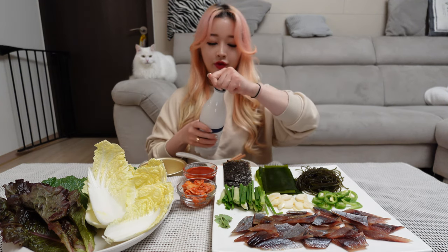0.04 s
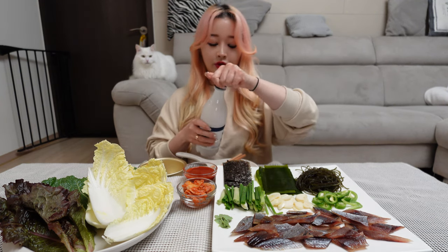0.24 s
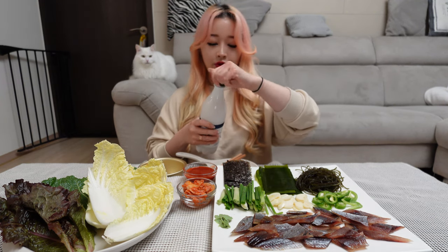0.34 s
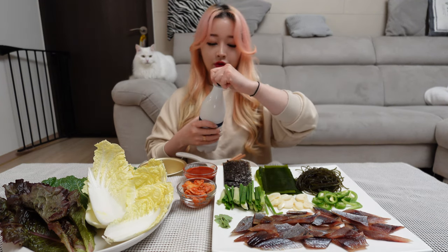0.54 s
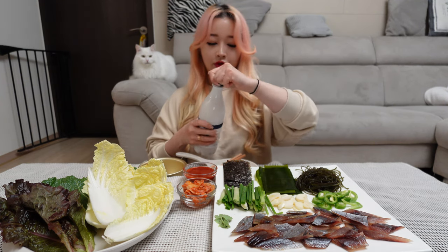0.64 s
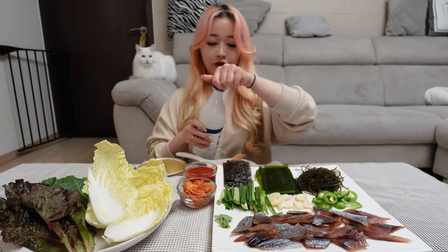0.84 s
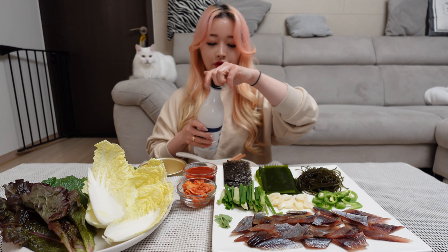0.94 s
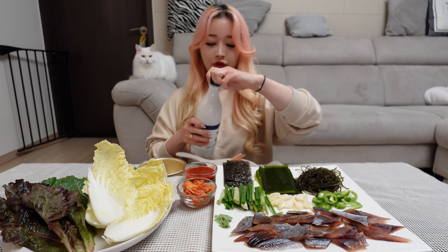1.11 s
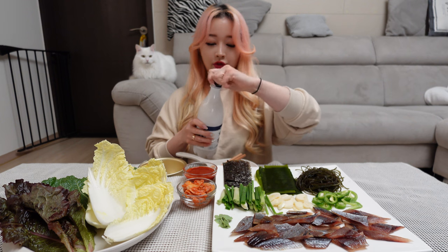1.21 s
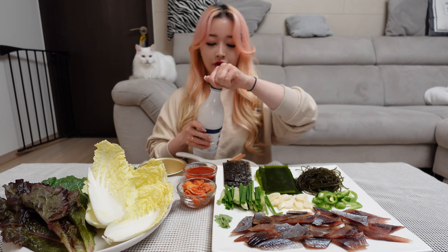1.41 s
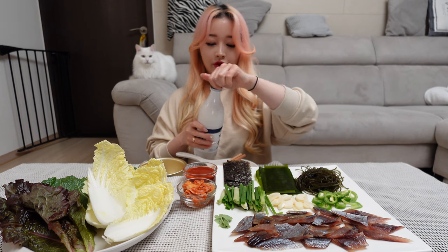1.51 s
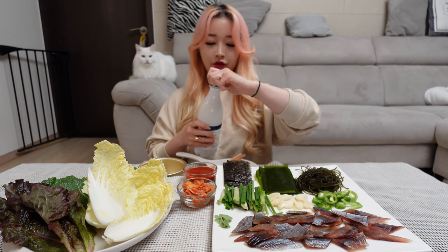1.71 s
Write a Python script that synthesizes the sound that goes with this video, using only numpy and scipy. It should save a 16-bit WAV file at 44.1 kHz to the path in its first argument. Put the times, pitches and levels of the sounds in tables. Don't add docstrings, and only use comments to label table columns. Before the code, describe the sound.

A fizzy bottle's plastic cap twists open in crisp cracks and brief hissing spurts over soft fizz

```python
import sys
import numpy as np
from scipy import signal
from scipy.fft import rfft, irfft
from scipy.io import wavfile

SR = 44100
rng = np.random.default_rng(int(sys.argv[2]) if len(sys.argv) > 2 else 0)


def wav_record(signal):
    frames = np.transpose(np.atleast_2d(signal))
    bounded = np.clip(frames, -1, 1)
    quanta = np.round(bounded * 32767).astype(np.int16)
    wavfile.write(sys.argv[1], SR, quanta)


def convert_level_to_amplitude(level_db):
    exponent = np.asarray(level_db, float) / 20
    return 10 ** exponent


N = 77175

NOISE_EDGE_HZ = 15800
# hz, likeness (0 to 1)
ROOM_LIKENESS = [(2000, 0.99), (4000, 0.56), (8000, 0.63), (15000, 0.72)]
# hz, likeness (0 to 1)
STEADY_LIKENESS = [(60, 0.89), (180, 0.89), (550, 0.71), (1650, 0.61), (4970, 0.52), (15000, 0.8)]


def rms_one(x):
    return x / np.sqrt(np.mean(x ** 2) + 1e-20)


def unit(x):
    energy = np.sum(x ** 2, axis=1)
    pair = energy[:2].mean()
    return x / np.sqrt([[pair], [pair], [energy[2]]])


def at_hz(points, hz):
    table_hz, value = np.transpose(points)
    return np.interp(np.log(hz), np.log(table_hz), value)


def drift(rate_hz):
    r = np.exp(-2 * np.pi * rate_hz / SR)
    wander = signal.lfilter([1], [1, -2 * r, r * r], rng.standard_normal(N + SR))
    return rms_one(wander[SR:])


def resonate(x, hz, width_hz):
    r = np.exp(-np.pi * width_hz / SR)
    feedback = [1, -2 * r * np.cos(2 * np.pi * hz / SR), r * r]
    return signal.lfilter([(1 - r * r) / 2, 0, (r * r - 1) / 2], feedback, x)


def high_pass(x, hz):
    return signal.sosfilt(signal.butter(4, hz, "high", fs=SR, output="sos"), x)


def to_stereo(mid, side, likeness):
    return np.sqrt(1 + likeness) * mid + np.sqrt(1 - likeness) * side * [[1], [-1]]


def stereo_noise(spectrum, alike):
    hz = np.maximum(np.arange(N // 2 + 1) * SR / N, 1)
    likeness = np.clip(at_hz(alike, hz), 0, 1)
    low_edge = np.minimum(1, hz / spectrum[0][0]) ** 4
    high_edge = np.minimum(1, min(spectrum[-1][0], NOISE_EDGE_HZ) / hz) ** 200
    white = rfft(rng.standard_normal((2, N)))
    mid, side = white * convert_level_to_amplitude(at_hz(spectrum, hz)) * low_edge * high_edge
    return rms_one(irfft(to_stereo(mid, side, likeness), N))


def snaps():
    # start_s, then neck_db, skirt_db, crack_db, top_crack_db (energy)
    snap_table = [(0.2238, -53, -30, -18, -10), (0.2258, -11, -9.5, -7, -6.0),
                  (0.3723, -20.5, -22, -35, -36), (0.6116, -8, -2, -11.5, -7),
                  (0.6136, -4.5, -14, -7.5, -10.5), (0.644, -4.0, -26, -7.5, -10),
                  (0.6567, -10.0, -15, -16, -13.0), (0.6854, -5.0, -22, -7, -4.5),
                  (0.703, -14, -37, -7, -13), (0.7188, -15, -22, -10, -12.0), (0.7562, -6, -13, -3.5, -12),
                  (0.771, -15.5, -21, -16, -15), (0.8214, -6.5, -9.5, -6.5, -2.5),
                  (0.842, -16.0, -38, -6.0, -12), (0.96, -25, -41.0, -30, -29),
                  (1.2384, -27, -41, -22, -22), (1.267, -25.5, -40, -14.5, -15.5),
                  (1.371, -4.5, -11.5, -3.5, -2.0), (1.4642, -13.5, -18, -10, -13),
                  (1.5778, -23.5, -37, -30, -32), (1.6683, -34, -29, -23.5, -45)]
    # neck_hz, crack_hz, room_send_db
    pitch_table = [(3000, 8600, 3), (2580, 7500, 0.5), (3000, 6400, 0), (2930, 7600, -2), (2926, 8800, -1),
                   (2770, 10700, 2), (2800, 13000, -2.5), (2670, 9100, -0.5), (3280, 8500, 0),
                   (2600, 12700, -7.5), (2500, 11300, -1.5), (2400, 7800, 0.5), (3015, 8500, -0.5),
                   (2480, 9100, -1.5), (2780, 13000, -1), (2250, 9100, 4), (2300, 9300, -11),
                   (2770, 10260, 0), (2810, 11200, -1.5), (2650, 8400, -3), (2600, 10400, -1)]
    creak_db, creak_s, tear_s = -29, 0.00035, 0.0011
    splinter_db, splinter_share = 3.0, 2.54
    likeness = 0.77
    lead = 300
    t = (np.arange(900) - lead) / SR
    creak = convert_level_to_amplitude(creak_db) * np.exp(np.minimum(t, 0) / creak_s)
    shape = np.where(t < 0, creak, np.exp(-np.maximum(t, 0) / tear_s))
    first_break = t == 0
    noise = rng.standard_normal((len(snap_table), 2, len(t)))
    rough = rng.exponential(1, (len(snap_table), len(t)))
    out = np.zeros((3, N + SR))
    for (start_s, *levels_db), (neck_hz, crack_hz, send_db), grain, jolt in zip(
            snap_table, pitch_table, noise, rough):
        mid, side = shape * grain * convert_level_to_amplitude(splinter_db * np.minimum(jolt, 3))
        size = np.sqrt(np.sum(mid ** 2)) / splinter_share
        mid = mid / size + first_break
        side = np.sqrt(1 - likeness) * high_pass(side / size, 4700)
        tear = np.array([mid + side, mid - side, first_break])
        sound = bottle_and_cap(tear, levels_db, neck_hz, crack_hz)
        sound = sound * convert_level_to_amplitude(send_db * np.array([[0], [0], [1]]))
        i = int(start_s * SR) - lead
        out[:, i:i + len(t)] += sound
    return high_pass(out[:, :N], 1100)


def bottle_and_cap(tear, levels_db, neck_hz, crack_hz):
    def ring(hz, width_hz):
        once = resonate(tear, hz, width_hz)
        return unit(resonate(once, hz, 2 * width_hz))
    neck_width_hz, shoulder_hz = 680, 4260
    neck = ring(neck_hz, neck_width_hz)
    neck = neck - convert_level_to_amplitude(-12) * ring(shoulder_hz, neck_width_hz)
    neck = neck - convert_level_to_amplitude(-27) * ring(1700, 1260)
    skirt = ring(5810, 2230)
    crackle = unit(high_pass(tear, shoulder_hz))
    crack = ring(crack_hz, 3800) + convert_level_to_amplitude(-7) * crackle
    top_crack = ring(14540, 3200)
    parts = [neck, skirt, -crack, top_crack]
    return sum(convert_level_to_amplitude(db) * part for db, part in zip(levels_db, parts))


def room(direct, diffuse):
    # delay_s, level_db, low_cut_hz
    echo_table = [
        (.0013, -15, 2000),
        (.0083, -13.5, 10000),
        (.0099, -7, 12300),
    ]
    # hz, time_s
    dying_time = [(2000, .42), (4000, 0.52), (8000, 0.44), (15000, 0.29)]
    # hz, level_db
    tail_colour = [(2000, 0.5), (3000, -3.5), (4200, 1), (6000, 1), (8500, -5.5), (11500, -4.5), (15000, 4)]
    onset_s, tail_db = 0.0058, -9
    t = np.arange(SR // 2) / SR
    white = rng.standard_normal((2, 2, len(t)))
    edges = 1400 * 2 ** np.arange(0, 3.8, 0.5)
    tail = 0
    for k, (low, high) in enumerate(zip(edges, edges[1:])):
        hz = np.sqrt(low * high)
        band = signal.butter(2, [low, high], "band", fs=SR, output="sos")
        mid, side = signal.sosfilt(band, white[k % 2])
        pair = to_stereo(mid, side, np.clip(at_hz(ROOM_LIKENESS, hz), 0, 1))
        tail = tail + pair * convert_level_to_amplitude(at_hz(tail_colour, hz) - 60 * t / at_hz(dying_time, hz))
    tail = tail * np.clip((t - onset_s) / 0.003, 0.15, 1) * convert_level_to_amplitude(tail_db) / 20
    edge_cut = signal.cheby2(12, 50, NOISE_EDGE_HZ + 500, fs=SR, output="sos")
    tail = signal.sosfilt(edge_cut, tail)
    out = signal.fftconvolve(diffuse[None], tail, axes=1)[:, :N]
    for delay_s, db, low_cut_hz in echo_table:
        out = out + convert_level_to_amplitude(db) * np.roll(high_pass(direct, low_cut_hz), int(delay_s * SR), axis=1)
    return out


def puff():
    # hz, level_db (per Hz)
    puff_colour = [(1600, -19), (2700, 0), (4000, -11), (6000, 0.5), (8000, -7), (15000, -14)]
    start_s, rise_s, fall_s, level_db = 0.234, 0.021, 0.084, -39.5
    t = np.arange(N) / SR - start_s
    flow = np.clip(t / rise_s, 0, 1) * np.exp(-np.maximum(t - rise_s, 0) / fall_s)
    return convert_level_to_amplitude(level_db) * flow * stereo_noise(puff_colour, ROOM_LIKENESS)


def gas():
    # start_s, rise_s, hold_s, fall_s, level_db
    spurt_table = [
        (0.352, 0.0082, 0.094, 0.026, -46.5),
        (0.927, 0.016, 0.024, 0.028, -50),
        (1.155, 0.021, 0.12, 0.02, -57),
        (1.56, 0.011, 0.011, 0.022, -48),
        (1.598, 0.017, 0.017, 0.016, -51),
    ]
    # hz, level_db (per Hz)
    jet_colour = [(880, -24), (1500, -17), (2230, -8.5), (2860, -4.5), (4000, -12), (4330, -8),
                  (7100, -12.5), (8490, -5), (16000, -5)]
    # pitch_hz, width_hz, level_db
    whistle_table = [
        (2840, 300, -18),
        (8080, 430, -7),
    ]
    likeness, flutter_db, flutter_hz = 0.8, 0.8, 71
    t = np.arange(N) / SR
    flow = 0
    for start_s, rise_s, hold_s, fall_s, db in spurt_table:
        opening = np.clip((t - start_s) / rise_s, 0, 1)
        closing = np.exp(-np.maximum(t - start_s - rise_s - hold_s, 0) / fall_s)
        flow = flow + convert_level_to_amplitude(db) * opening * closing
    jet = stereo_noise(jet_colour, [(1000, likeness), (16000, likeness)])
    whistles = sum(convert_level_to_amplitude(db) * rms_one(resonate(jet, hz, width)) for hz, width, db in whistle_table)
    return (jet + whistles) * flow * convert_level_to_amplitude(flutter_db * drift(flutter_hz))


def fizz():
    # hz, level_db (per Hz)
    fizz_colour = [(410, -43), (700, -26.5), (997, -3), (1080, -6.5), (1460, -4.5), (2770, -9.5),
                   (3740, -11.5), (6070, -15), (16000, -16.5)]
    # time_s, level_db
    vigour_table = [
        (0, 1),
        (.5, 2),
        (1.0, 2),
        (1.4, 2.5),
        (1.75, 0.5),
    ]
    vigour_db = np.interp(np.arange(N) / SR, *np.transpose(vigour_table))
    level_db = -51 + vigour_db + 0.44 * drift(24)
    return convert_level_to_amplitude(level_db) * stereo_noise(fizz_colour, STEADY_LIKENESS)


def hum():
    # hz, level_db (per Hz)
    hum_colour = [(15, -52), (25, -20), (65, -19.5), (134, -14), (211, -5), (345, -2), (405, 2.5),
                  (581, -5.5), (800, -7), (1040, -54), (1760, -120)]
    return convert_level_to_amplitude(-68) * high_pass(stereo_noise(hum_colour, STEADY_LIKENESS), 39)


def scene():
    cap = snaps()
    direct, diffuse = cap[:2], cap[2]
    mix = direct + room(direct, diffuse) + puff() + gas() + fizz() + hum()
    return mix * convert_level_to_amplitude(0.09 * np.array([[1], [-1]]))


def roll_off(x):
    return signal.sosfilt(signal.butter(12, 16960, fs=SR, output="sos"), x)


def record(dry):
    top_cut = signal.cheby2(10, 60, 17300, fs=SR, output="sos")
    mix = signal.sosfilt(top_cut, dry)
    return roll_off(mix)


dry = scene()
out = record(dry)
wav_record(out)
```